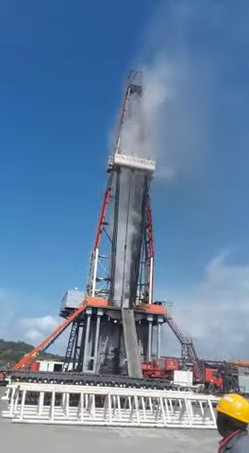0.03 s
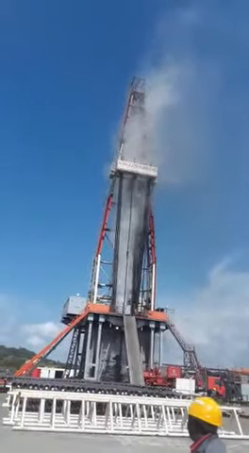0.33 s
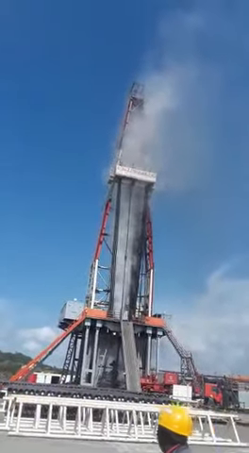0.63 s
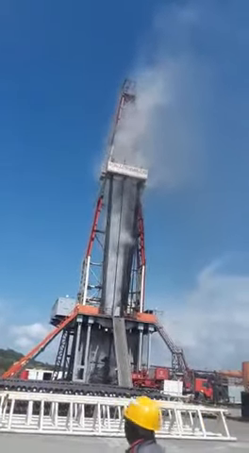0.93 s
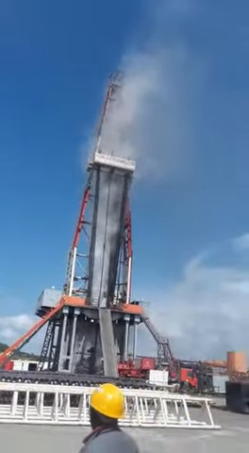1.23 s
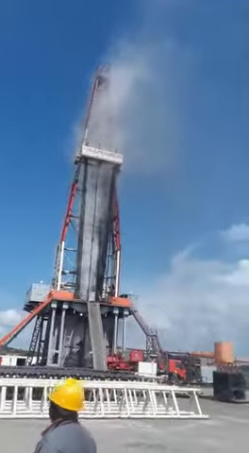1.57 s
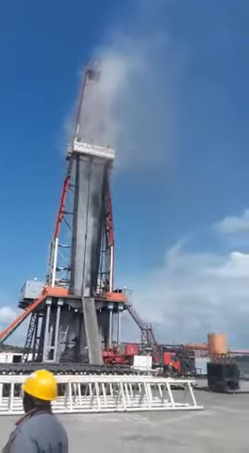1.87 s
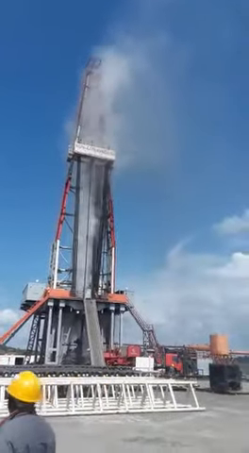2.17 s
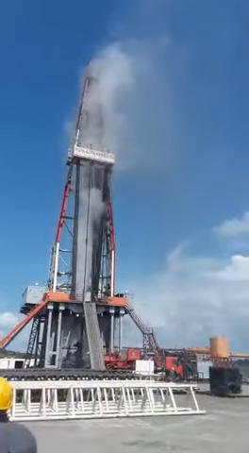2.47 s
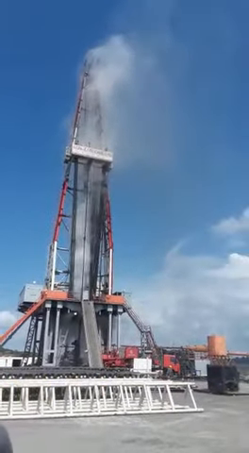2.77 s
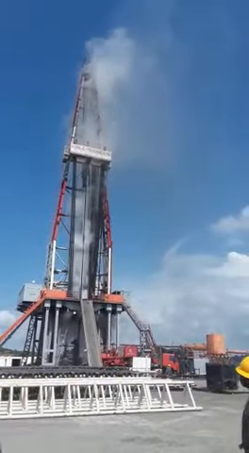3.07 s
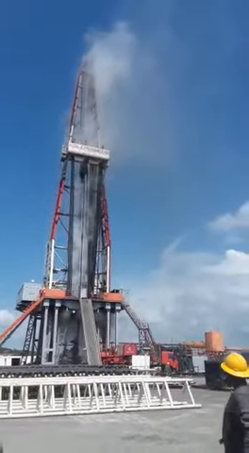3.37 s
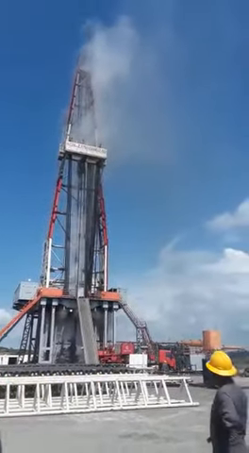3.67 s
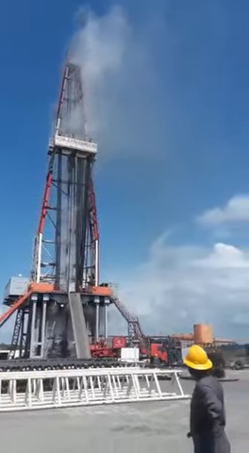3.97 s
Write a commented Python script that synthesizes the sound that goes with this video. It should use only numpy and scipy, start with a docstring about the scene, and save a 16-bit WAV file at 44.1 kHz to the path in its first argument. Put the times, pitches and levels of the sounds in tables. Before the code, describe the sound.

Across an open yard, a drilling rig vents steam in a heavy, rushing roar with a low pipe drone. The roar swells, dulls and fades through a brief hollow hum, and a quieter hiss rises in its place.

```python
"""Steam blasts out of a well through a drilling rig, heard across an open yard.
Over a low rumble, turbulent flow roars and excites the pipe's resonances, surging after about 1 s.
From about 2.5 s the flow chokes: a hollow hum swells and the roar dies away, treble first.
After 3 s a thinner, hissing jet builds up, also treble first. Throughout, two close microphones
pick it up, the left one later and with less treble; each has its own gain control."""
import sys
import numpy as np
from scipy import signal
from scipy.fft import rfft, irfft
from scipy.io import wavfile
from scipy.ndimage import uniform_filter1d

SR = 44100
rng = np.random.default_rng(int(sys.argv[2]) if len(sys.argv) > 2 else 0)


def transcribe(signal):
    """Save signal, clipped to [-1, 1], as a 16-bit WAV file at the path in sys.argv[1]."""
    frames = np.atleast_2d(signal).T
    limited = np.clip(frames, -1, 1)
    pcm = np.round(limited * 32767).astype(np.int16)
    wavfile.write(sys.argv[1], SR, pcm)


N = 176400
HZ = np.fft.rfftfreq(N, 1 / SR)

# left microphone relative to right, for the roar and the resonances (f/Hz, level/dB)
ROAR_SHADE = [(100, 1), (300, 0.5), (400, 3.5), (800, 0.7), (1030, 4.5), (1350, -0.6), (1580, 3),
              (1880, -0.5), (2200, 4), (2550, -4), (3200, -2), (3700, -6.5), (4150, -6.5), (4900, -10),
              (5500, -15.5), (6500, -14.5), (7700, -21.5), (9000, -17), (10500, -16.5), (15000, -18)]
# the same for the jet and the rumble (f/Hz, level/dB)
JET_RUMBLE_SHADE = [(100, 3), (400, 3.5), (800, 4.5), (1150, 4), (1900, 3.5), (2600, 1), (3800, -8),
                    (5400, -12.5), (7000, -24.5), (8500, -19), (11500, -27), (15000, -14)]


def amp(db):
    """Amplitude ratio: a factor of ten for every 20 dB."""
    return 10 ** (np.asarray(db) / 20)


def at_frequency(table, hz):
    """Interpolation on a logarithmic frequency axis."""
    f, value = np.transpose(table)
    return np.interp(np.log(hz + 1), np.log(f + 1), value)


def at_time(table, t):
    """Linear interpolation in time."""
    return np.interp(t, *np.transpose(table))


def turbulence(spectrum, shade):
    """Partial coherence: flow noise reaches two spaced microphones alike only in part, the left later."""
    # likeness of the two signals (f/Hz, coherence)
    coherence = [(100, 1), (300, 0.96), (480, 0.85), (680, 1), (950, 0.84), (1300, 0.91), (1550, 0.37),
                 (1850, 0.7), (2400, 1), (2700, .43), (3600, 0.25), (4200, 0.7), (4600, .3), (5800, 0.7),
                 (7500, .15), (12000, .2)]
    # lag of the left signal (f/Hz, delay/ms)
    lag = [(100, 0.15), (340, 0.07), (600, 0.24), (1300, 0.26), (1520, 0.24), (1750, 0.31), (6000, 0.32)]
    right, independent = rfft(rng.standard_normal((2, N)))
    common = np.clip(at_frequency(coherence, HZ), 0, 1)
    delay = np.exp(-2j * np.pi * HZ * at_frequency(lag, HZ) / 1000)
    blend = common * right + np.sqrt(1 - common ** 2) * independent
    left = blend * delay * amp(at_frequency(shade, HZ))
    return irfft(np.array([left, right]) * spectrum * np.sqrt(SR / 2), N)


def shape_spectrum(noise, gain_db):
    """Time-varying filtering: each short-time spectrum is weighted by gain_db(hz, t)."""
    frames = dict(nperseg=512, noverlap=384)
    hz, t, spectra = signal.stft(noise, SR, **frames)
    _, shaped = signal.istft(spectra * amp(gain_db(hz[:, None], t)), SR, **frames)
    return shaped[:, :N]


def resonance(modes, envelope):
    """Forced resonance: noise excites a Lorentzian peak at each mode, under a common level envelope."""
    spectrum = sum(amp(db) / (1 + ((HZ - hz) / half_width) ** 2) for hz, half_width, db in modes)
    return turbulence(spectrum, ROAR_SHADE) * amp(at_time(envelope, np.arange(N) / SR))


def pipe_ringing():
    """Standing waves: the well pipe reinforces the flow noise near its natural frequencies."""
    # pipe resonances (f/Hz, half width/Hz, peak level/dB)
    modes = [(53.3, 3.4, -53), (168, 6.1, -36.5), (240.3, 13, -40.5), (340, 5.4, -40.5),
             (459.4, 6.2, -40.5), (599, 12, -46.5), (658, 33, -45.5)]
    # ringing relative to the roar (t/s, level/dB)
    envelope = [(0, 0.5), (.35, 3.5), (.75, -6), (.97, 7), (1.25, 1), (1.7, 0.5), (2.4, 1), (2.67, 2),
                (3.2, 5)]
    return resonance(modes, envelope)


def low_tone():
    """Narrow-band noise: a tone near 100 Hz wavers irregularly in loudness, then drops away near 2.5 s."""
    # spectral peak of the tone (f/Hz, half width/Hz, peak level/dB)
    peak = [(100.5, 3.6, -36)]
    # tone relative to the roar (t/s, level/dB)
    envelope = [(0, -16), (.4, 2), (.75, -7), (1.18, 7), (1.349, 5), (1.7, 4.5), (1.9, -3), (2.35, -1),
                (2.55, -21)]
    return resonance(peak, envelope)


def roar():
    """Turbulence radiates broadband noise; with the pipe's ringing it fills out, then dulls on choking."""
    # spectrum of the rushing steam (f/Hz, level/dB)
    colour = [(20, -74.5), (36, -71.5), (52, -54), (68, -52.5), (95, -41.5), (200, -38), (330, -40),
              (430, -48), (520, -44.5), (720, -44), (900, -49.5), (1150, -52.5), (1420, -51.5),
              (1600, -58.5), (1850, -55.5), (2120, -61.5), (2400, -59.5), (3000, -65.5), (4100, -70),
              (5400, -73), (6600, -86), (7200, -85), (8100, -94.5), (8900, -98.5), (11300, -93),
              (13000, -97.5), (15700, -105)]
    # strength of the blast (t/s, level/dB)
    envelope = [(0, 10.5), (.2, 11), (.6, 8.5), (.82, 7.3), (1.05, 14.5), (1.25, 14), (1.5, 13), (1.8, 13),
                (2.15, 9), (2.35, 6.5), (2.52, 2), (2.62, 3), (2.66, 3.5), (2.8, -5.5), (3.02, -11),
                (3.15, -15.5), (3.3, -21), (3.5, -36), (4, -40)]
    # how fully the blast has opened (t/s, signed weight)
    fullness = [(0, -0.97), (.9, -1.16), (1.3, 0.033), (1.8, 1), (2.2, 0.93), (2.7, -0.18), (3.3, 0.69)]
    # spectral change per unit of fullness (f/Hz, level/dB)
    filling = [(40, 7.5), (100, -5), (160, -1.5), (230, 3.5), (380, -1), (480, 0.5), (780, -1), (1200, 2),
               (1450, 0), (2200, -1), (4000, -0.5), (11000, -1)]
    # how far the flow is choked (t/s, signed weight)
    choke = [(0, 0.24), (2.15, -0.17), (2.5, 0.19), (2.7, 0.97), (2.87, 0.86), (3.05, 0.78), (3.3, 1.3)]
    # spectral change per unit of choking (f/Hz, level/dB)
    dulling = [(50, 0), (100, -10.5), (170, -9.5), (310, 3.5), (470, -7), (640, -3.5), (1200, -4.5),
               (2500, -7.5), (5000, -10), (11000, -9.5)]

    def gain_db(hz, t):
        opening_db = at_time(fullness, t) * at_frequency(filling, hz)
        choking_db = at_time(choke, t) * at_frequency(dulling, hz)
        return at_time(envelope, t) + opening_db + choking_db

    rush = turbulence(amp(at_frequency(colour, HZ)), ROAR_SHADE)
    return shape_spectrum(rush + pipe_ringing() + low_tone(), gain_db)


def yard_rumble():
    """Stationary noise: a steady background with its power at low frequencies."""
    # spectrum of the rumble (f/Hz, level/dB)
    colour = [(20, -84), (50, -74), (100, -59), (220, -62), (420, -70), (1000, -83), (4000, -105),
              (15700, -130)]
    return turbulence(amp(at_frequency(colour, HZ)), JET_RUMBLE_SHADE)


def hollow_hum():
    """Two neighbouring resonances, driven by noise, swell and fade as the flow chokes."""
    # resonances of the hum (f/Hz, half width/Hz, peak level/dB)
    modes = [(286.6, 18, -48.5), (342, 12, -48)]
    # strength of the hum (t/s, level/dB)
    envelope = [(2.199, -11), (2.651, 3.5), (2.9, -4), (3.19, -4), (3.3, -14), (3.6, -38)]
    return resonance(modes, envelope)


def hissing_jet():
    """Jet noise builds as the roar collapses; the high frequencies follow the flow first."""
    # spectrum of the jet (f/Hz, level/dB)
    colour = [(20, -82), (45, -71.5), (80, -56), (125, -55.5), (180, -61), (240, -57), (350, -65),
              (440, -73.5), (620, -62), (800, -64), (1100, -67), (1600, -72.5), (2000, -70), (2700, -74.5),
              (3400, -79.5), (4300, -78.5), (5300, -82.5), (6800, -91), (8800, -104), (10300, -101),
              (11900, -97.5), (15700, -108)]
    # strength of the jet at 1 kHz (t/s, level/dB)
    envelope = [(2.5, -26), (3.05, -22.5), (3.25, -10), (3.45, -4.7), (3.6, -2.5), (3.75, -1), (3.92, 2),
                (4.1, 3)]
    lead_s_per_octave = 0.021

    def gain_db(hz, t):
        octaves = np.log2(np.maximum(hz, 250) / 1000)
        return at_time(envelope, t + lead_s_per_octave * octaves)

    hiss = turbulence(amp(at_frequency(colour, HZ)), JET_RUMBLE_SHADE)
    return shape_spectrum(hiss, gain_db)


def scene():
    """Superposition: the pressures of the independent sources add at each microphone."""
    return roar() + hollow_hum() + hissing_jet() + yard_rumble()


def record(dry):
    """Dynamic compression holds each channel down when it is loud; a low-pass filter limits the band."""
    threshold_db, ratio, response_s, cutoff_hz = -16.5, 3.13, 0.023, 15750
    span = int(response_s * SR)
    power = abs(uniform_filter1d(dry ** 2, span, axis=1))
    power_db = 10 * np.log10(power + 1e-12)
    excess_db = uniform_filter1d(np.maximum(power_db - threshold_db, 0), span, axis=1)
    compressed = dry * amp(-excess_db * (1 - 1 / ratio))
    lowpass = signal.firwin(511, cutoff_hz, window=("kaiser", 9), fs=SR)
    return signal.oaconvolve(compressed, lowpass[None], "same")


dry = scene()
out = record(dry)
transcribe(out)
```